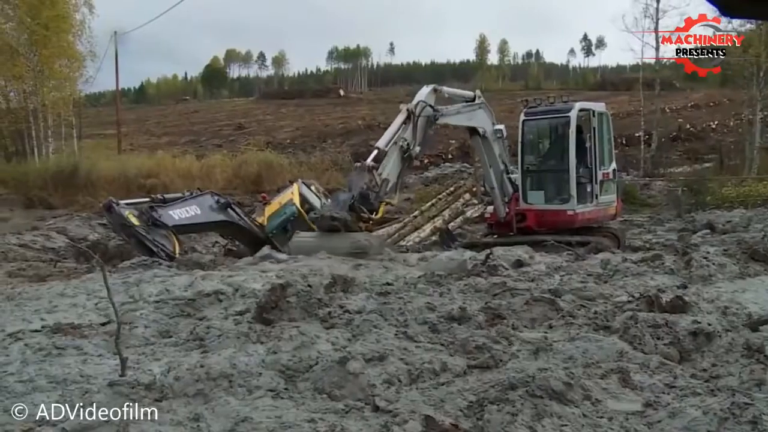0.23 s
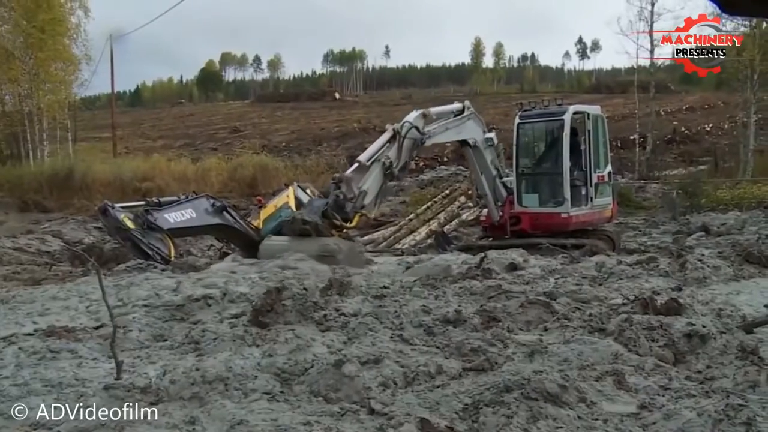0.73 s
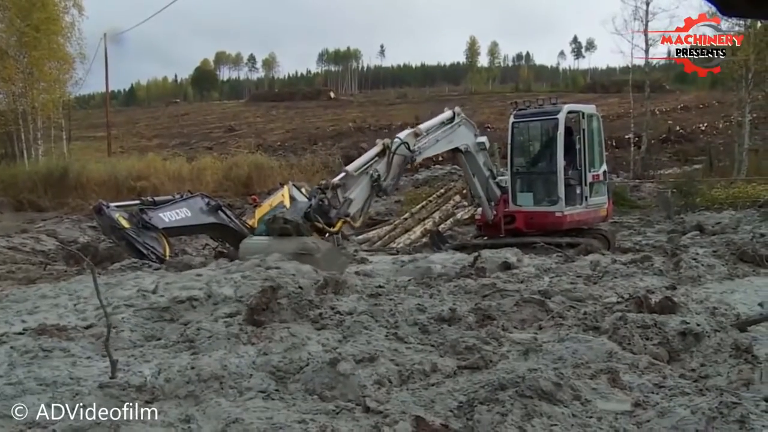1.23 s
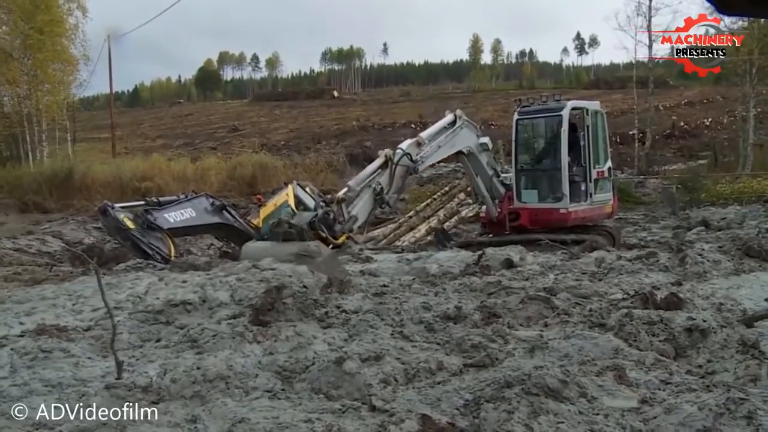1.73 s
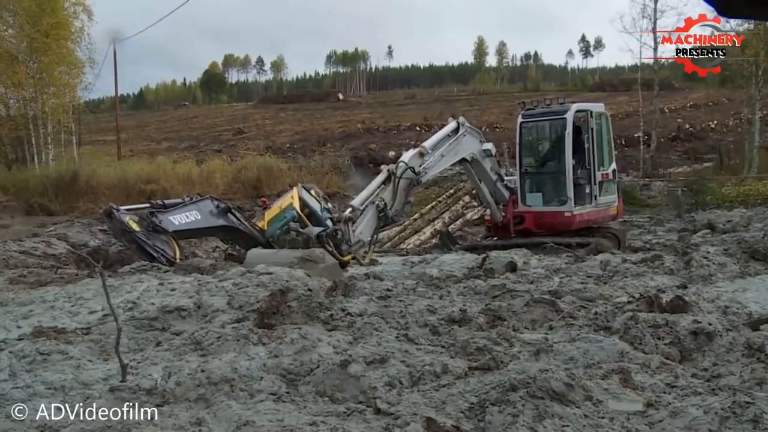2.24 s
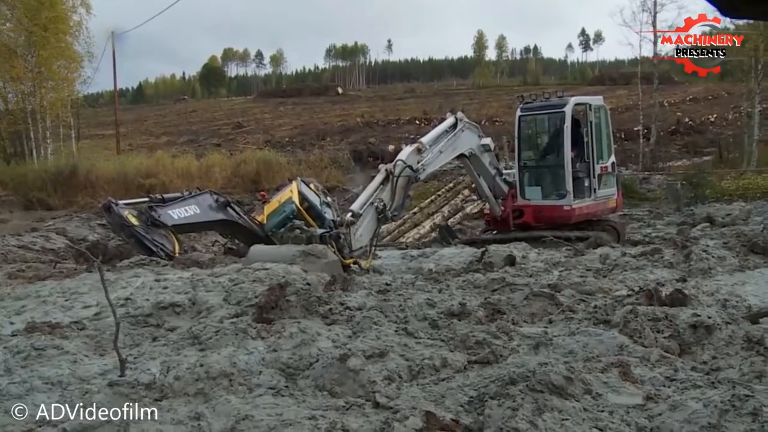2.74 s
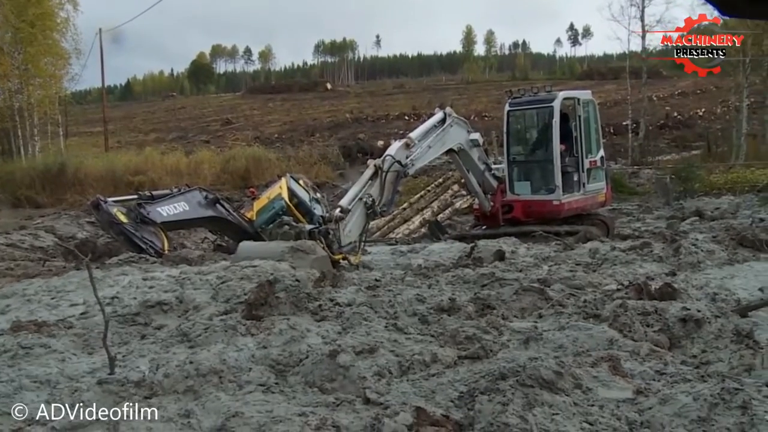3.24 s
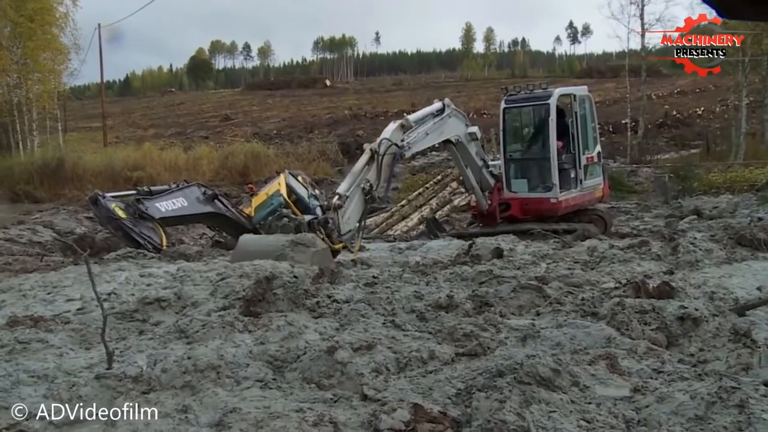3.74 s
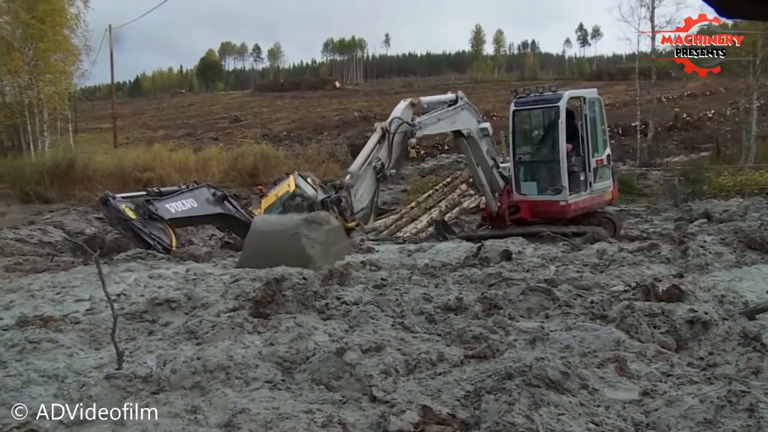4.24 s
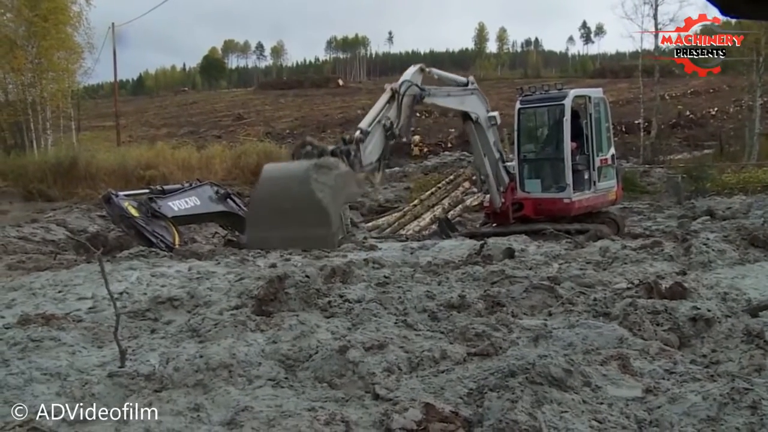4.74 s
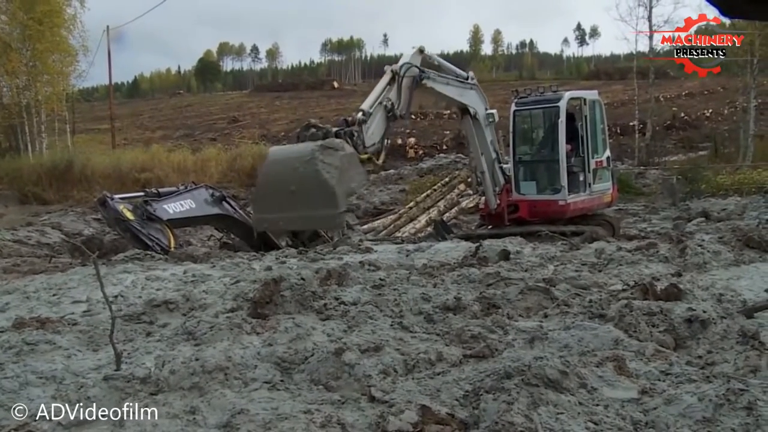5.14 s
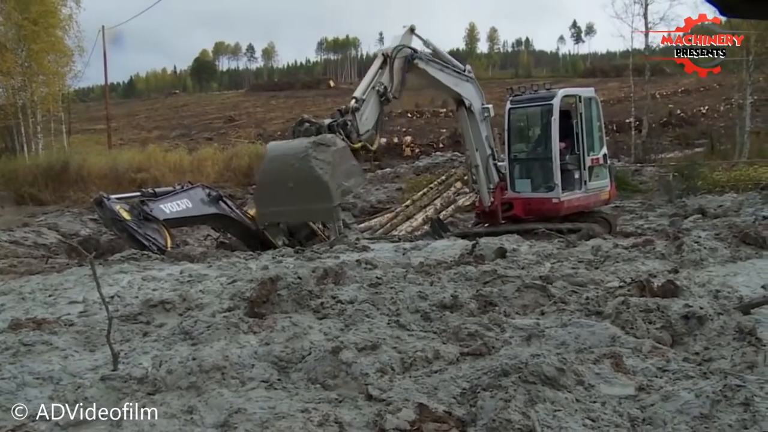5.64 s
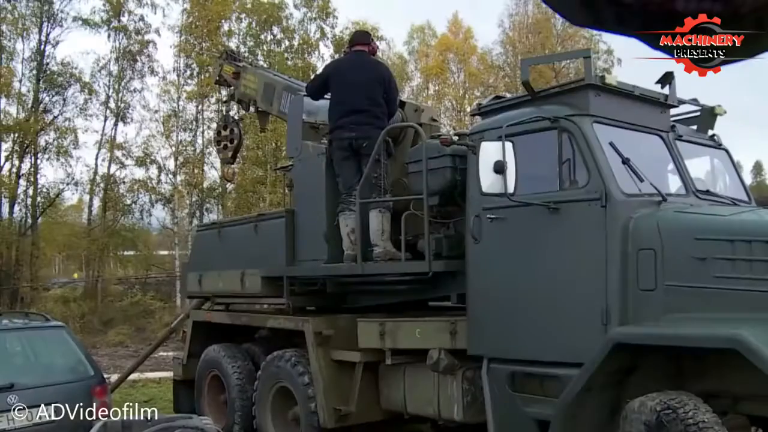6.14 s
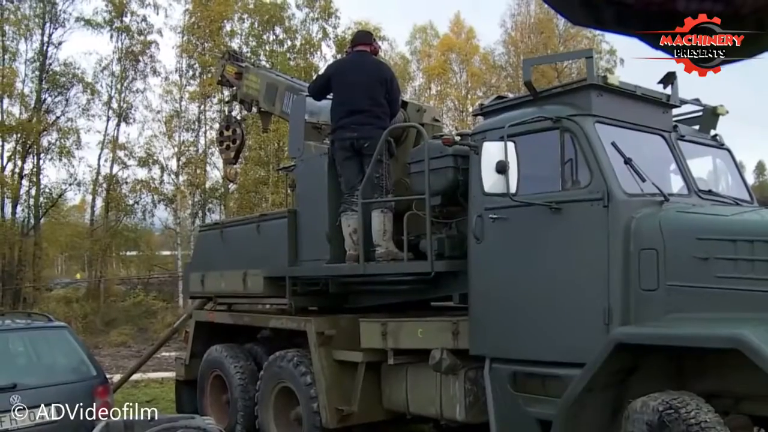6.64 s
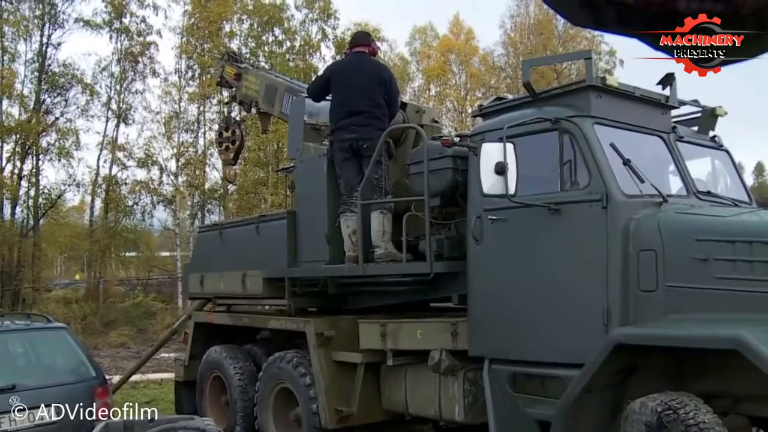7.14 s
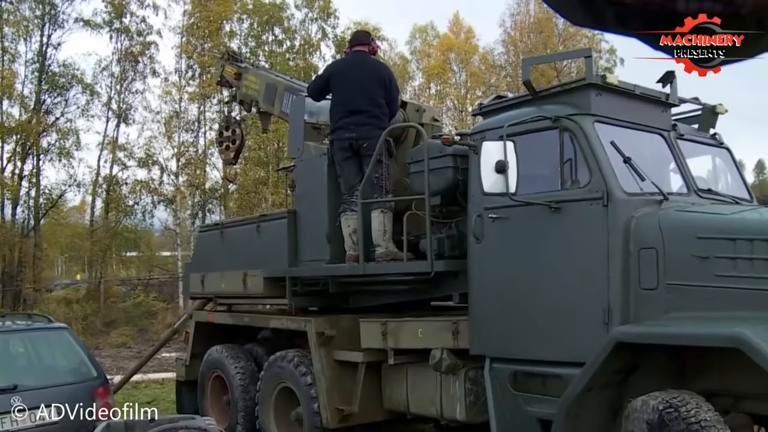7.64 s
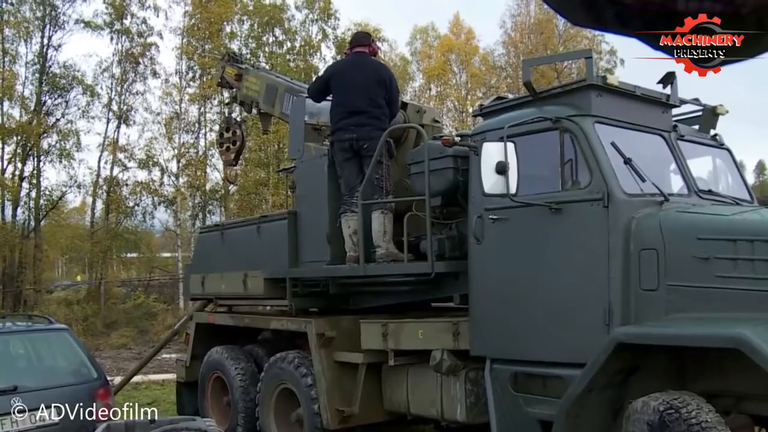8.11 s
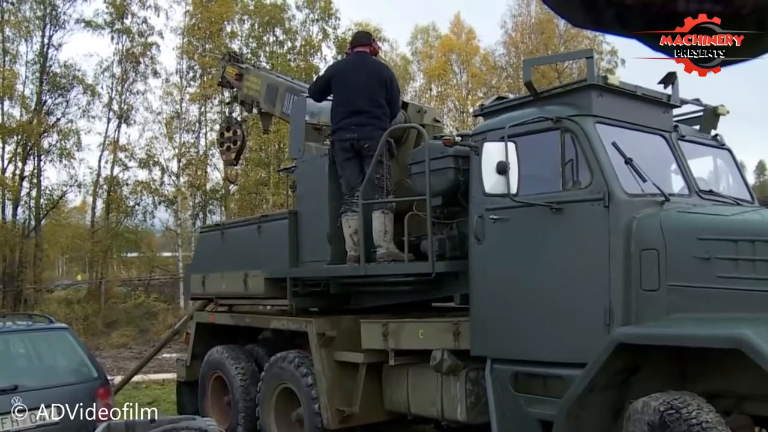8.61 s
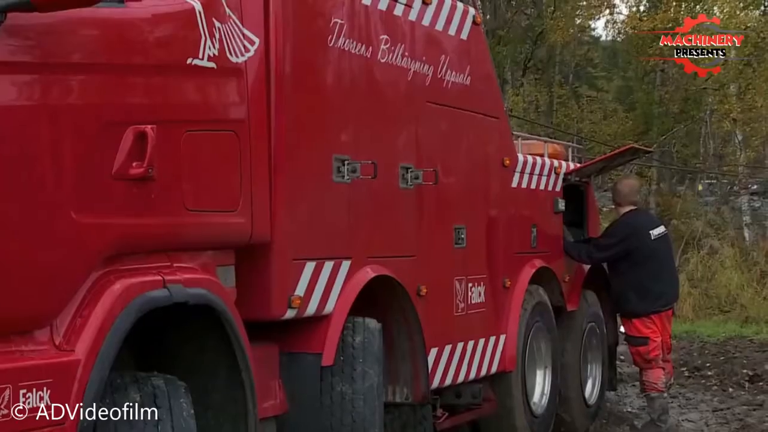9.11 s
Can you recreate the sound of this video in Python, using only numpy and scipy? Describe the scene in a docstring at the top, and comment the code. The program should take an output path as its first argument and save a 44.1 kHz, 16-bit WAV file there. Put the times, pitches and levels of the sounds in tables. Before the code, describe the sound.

Outdoors, an excavator's diesel throbs steadily some way off under a hydraulic pump whine. Its boom groans at the start, snaps crack close by, and oil hisses as the boom lifts. At about six seconds it cuts to a far louder truck engine heard up close, deep and fast-idling with light metallic clanks; at nine seconds another truck takes over, with ticking valves and dense clanking. Stereo, engines stronger on the right.

```python
"""A diesel excavator throbs some way off over pump whine, with boom groans, hissing oil and a few snaps.
At 6.2 s we are suddenly beside a heavy winch truck at fast idle, and at 9 s beside a recovery truck.
Engine and pump tones are multiples of a rotation; engine noise is coloured noise shaped by the firings.
Creaks and clanks are short rings of steel; snaps and ticks are noise bursts through wide resonances.
Two microphone ports hear it all, the right one nearer the engines."""
import sys
import numpy as np
from scipy import signal
from scipy.fft import rfft, irfft, next_fast_len
from scipy.io import wavfile
from scipy.ndimage import uniform_filter1d

SR = 44100
rng = np.random.default_rng(int(sys.argv[2]) if len(sys.argv) > 2 else 0)


def inscribe(sig):
    """Save sig as 16-bit PCM at rate SR to the path in sys.argv[1].

    A 1-D sig is mono; a 2-D sig holds one channel per row.
    Samples are clipped to [-1, 1] before scaling.
    """
    pcm = np.round(np.clip(np.atleast_2d(sig).T, -1, 1) * 32767)
    wavfile.write(sys.argv[1], SR, pcm.astype(np.int16))


N = 413216
T = np.arange(N) / SR  # seconds
F = np.maximum(np.fft.rfftfreq(next_fast_len(N, True), 1 / SR), 1)  # Hz
FFT_LENGTH = 2 * (len(F) - 1)

# Excavator engine and pump over time.
# Each row: time in seconds, shaft speed in Hz, then firing tone, pump tone and pump overtone in dB.
DIGGER = [(0.0, 28.73, -27, -40.5, -51), (0.4, 28.63, -26, -45, -51), (1.0, 28.66, -25.5, -47, -49.5),
          (1.25, 28.32, -25.5, -41.5, -52), (1.45, 28.23, -24.5, -41, -47), (2.0, 28.24, -24.5, -40.5, -43),
          (2.3, 28.32, -26, -37, -40.5), (2.75, 28.16, -26.5, -38, -43), (2.79, 28.25, -23, -42.5, -51),
          (2.93, 28.53, -26.5, -50, -52), (2.98, 29.25, -29, -46, -61), (3.03, 30.1, -29, -41, -53),
          (3.075, 29.97, -24, -47, -58), (3.11, 29.06, -39, -49, -53), (3.17, 28.56, -27.5, -48, -56),
          (3.3, 28.76, -29.5, -41.5, -61), (3.7, 28.92, -26.5, -42, -62), (3.9, 28.84, -27, -53.5, -54),
          (4.1, 28.77, -27.5, -41.5, -52.5), (4.7, 29.22, -27.5, -44.5, -54),
          (5.1, 29.07, -27.5, -54.5, -51), (5.3, 28.78, -29.5, -45, -47), (5.5, 28.73, -25, -38.5, -54),
          (5.7, 28.75, -27.5, -45.5, -56), (6.1, 28.72, -26.5, -35, -46.5), (6.22, 28.64, -25, -38, -54)]
# Steady excavator tones. Each row: multiple of the shaft speed, level in dB.
DIGGER_ORDERS = [(2.5, -47), (3.5, -52), (4, -43), (4.5, -57), (5, -48.5), (5.5, -59), (6, -45.5),
                 (6.5, -59), (7, -55), (7.5, -49), (8, -51.5), (8.64, -50.5), (9.5, -61), (10.5, -62),
                 (15, -63.5)]
# Upper pump tones. Each row: multiple of the shaft speed, level in dB relative to UPPER_PUMP_LEVEL.
UPPER_PUMP = [(30, -13.5), (35, -6.5), (40, -1.5), (50, -7)]
# Level shared by the upper pump tones. Each row: time in seconds, level in dB.
UPPER_PUMP_LEVEL = [(0, -60), (1.2, -55.5), (2.8, -56.5), (2.95, -68), (3.15, -61), (3.4, -60.5),
                    (5.2, -58.5), (5.5, -54), (6.25, -53.5)]
# A hose sings while the bucket strains in the mud.
# The row: start, attack, stop and release in seconds, level in dB.
HOSE = (1.0, .5, 2.755, .03, -47.5)
# Colour of the excavator's noise. Each row: frequency in Hz, relative level in dB per Hz.
DIGGER_BODY = [(8, -27), (25, -9.5), (45, -5), (70, -11), (110, -17.5), (160, -24), (250, -23.5),
               (330, -31), (450, -36.5), (600, -27.5), (820, -38.5), (1400, -31), (1750, -42), (2500, -41),
               (3500, -48.5), (6400, -51), (16000, -61)]
# Resonant excavator panels. Each row: frequency in Hz, width in Hz, lift in dB.
DIGGER_PANELS = [(1268, 55, 4.5), (1440, 67, 4), (2024, 24, 9), (2670, 100, 1.5), (5210, 330, 5),
                 (8050, 320, 5), (9000, 320, 5.5), (9810, 250, 4.5), (12300, 500, 5), (7450, 200, 2.5),
                 (13200, 300, 2)]
# Low rumble around the excavator. Each row: time in seconds, level in dB on the block noise's scale.
DIGGER_RUMBLE = [(0, -41.5), (.5, -47.5), (1.0, -46), (1.6, -43.5), (2.4, -45.5), (2.7, -48.5), (3.3, -46),
                 (3.7, -46), (4.5, -46), (5.4, -45), (6.25, -44.5)]
# Treble hiss of the excavator, before flicker. Each row: time in seconds, level in dB.
DIGGER_HISS = [(0, -58.5), (.65, -60.5), (1.1, -58.5), (2.0, -59), (2.8, -59), (3.15, -60.5), (3.4, -59.5),
               (3.6, -59.5), (4.0, -58.5), (4.6, -58.5), (5.0, -60), (5.6, -58.5), (6.25, -58.5)]
DIGGER_BLOCK_DB = -47
OPENING_DB, OPENING_S = 7.5, 0.027  # block noise and hiss start this much louder, until this time

# Oil hisses through a valve while the boom lifts.
# The row: start, attack, stop and release in seconds, level in dB as it stands at 4 s.
VALVE = (3.1, .45, 4.8, .25, -66)
VALVE_SAG_DB_PER_S = 2.5
# Resonances of that hiss. Each row: frequency in Hz, width in Hz, level in dB relative to VALVE.
VALVE_BANDS = [(6270, 69, -4), (6420, 89.6, -3), (7550, 150, -5)]
# Short puffs of oil as a valve opens.
# Each row: start, attack, stop and release in seconds, level in dB.
PUFFS = [(2.73, 0.02105, 2.77, .04, -61), (3.04, .02, 3.125, .04, -63)]
# Resonance of the puffs. The row: frequency in Hz, width in Hz.
PUFF_BAND = (7200, 600)

# The boom creaks at its pins, one short ring for each slip.
# Each row: time in seconds, peak in dB, ring in Hz, swell in seconds (the peak comes halfway).
GROAN = [(0.022, -38, 660, 0.007), (0.047, -35, 650, .008), (0.065, -36, 620, .014),
         (0.091, -34, 640, 0.0092), (0.119, -31, 645, 0.0074), (0.133, -34, 635, .012),
         (0.144, -30, 636, .014), (0.192, -37, 654, .008), (0.225, -34, 651, .012), (0.245, -32, 633, .01),
         (0.259, -28.5, 620, 0.0082), (0.28, -31, 590, 0.0079), (0.294, -33, 590, 0.007),
         (0.31, -32, 590, 0.0064), (0.344, -34, 600, 0.0067), (0.362, -26.5, 609, 0.0066),
         (0.38, -28, 604, 0.0048), (1.913, -40, 600, 0.0086), (1.93, -37, 600, .008),
         (1.945, -36, 600, 0.0077), (2.026, -32, 598, .008), (2.126, -32, 590, 0.007),
         (2.756, -28, 628, 0.0063)]
# A short falling squeak. The row: start and length in seconds, first and last pitch in Hz, peak in dB.
SQUEAK = (1.034, .028, 1800, 1250, -41)
# A low thud dying away at the start. The row: pitch in Hz, peak in dB, time to fall 60 dB in seconds.
THUD = (104, -18.5, 0.15)

# The two trucks over time.
# Each row: time in seconds, exhaust level, block noise and hiss (before flicker) in dB.
WINCH = [(6.232, -13, -28, -43), (6.3, -5, -27.5, -42), (6.6, -3, -26.5, -42), (7.0, -1.5, -26.5, -39.5),
         (8.0, -1.5, -27, -40), (8.99, -2, -27, -40)]
RECOVERY = [(8.993, 0, -25, -42.5), (9.2, 0, -24.5, -41.5), (9.37, 0, -24.5, -42.5)]
# Exhaust tones. Each row: multiple of the engine cycle, level in dB relative to the exhaust level.
WINCH_ORDERS = [(3, -28), (4, -41), (5, -44), (6, -11), (7, -43), (9, -22), (11, -43), (12, -31), (13, -48),
                (15, -33), (16, -38), (18, -33), (19, -45), (20, -36.5), (21, -40), (22, -50), (24, -44),
                (27, -47), (29, -44), (30, -39.5), (32, -48), (33, -41), (37, -46), (39, -42), (40, -42),
                (70, -43)]
RECOVERY_ORDERS = [(3, -36), (6, -18), (9, -25.5), (12, -27.5), (15, -33.5), (18, -53.5), (24, -39.5),
                   (27, -44.5), (38, -42), (46, -43)]
# Colour of the trucks' noise, the winch truck's low end apart.
# Each row: frequency in Hz, relative level in dB per Hz.
WINCH_RUMBLE = [(8, -38), (22, -24), (60, -23), (110, -27), (170, -27.5), (222, -30), (255, -27)]
WINCH_BODY = [(340, -30.5), (420, -32), (610, -25), (960, -30.5), (1310, -25.5), (1840, -36), (2300, -37.5),
              (3100, -44.5), (7700, -50), (10500, -52.5), (13000, -62), (16000, -61.5)]
RECOVERY_BODY = [(8, -32), (25, -24), (70, -18), (120, -23), (300, -31), (480, -35.5), (694, -24.5),
                 (900, -30), (1080, -33), (1370, -21.5), (1800, -34.5), (2500, -42), (3900, -43),
                 (6300, -52.5), (16000, -66.5)]
# Resonant truck panels. Each row: frequency in Hz, width in Hz, lift in dB.
WINCH_PANELS = [(603, 54, 5), (703, 45, 1.5), (776, 69, 3), (1304, 83, 5.5), (1390, 18, 2.5), (1660, 23, 5),
                (2140, 53, 6), (2450, 30, 6.5), (4000, 710, 3.5), (7690, 270, 4)]
RECOVERY_PANELS = [(710, 82, 4), (854, 150, 3), (1320, 160, 3.5), (1550, 120, 0.5), (1854, 80, 8)]
# Engine cycle in Hz, and a time in seconds at which the first cylinder fires.
WINCH_CYCLE, RECOVERY_CYCLE = (8.598, 7.663), (8.43, 9.102)
THROB = 0.17  # depth of the knock's swell with the three exhaust beats of a cycle
# Tones away from the firing tone leave the pipe late:
# firing multiple, lag in rad per squared multiple, multiples that pull where the rest push.
DIGGER_LAG, TRUCK_LAG = (2, .6, ()), (6, .026, (3, 18))
# A steady hum just under the winch truck's ninth tone beats with it.
# The row: pitch in Hz, level in dB relative to the exhaust level, time of a crest in seconds.
NEIGHBOUR = (73.34, -28, 7.6754)

# Single clanks in the trucks' panels. Each row: time in seconds, peak in dB, ring in Hz.
CLANKS = [(6.757, -23, 1230), (6.945, -18, 1315), (7.677, -21, 1287), (7.985, -17, 1344),
          (8.857, -20, 1280), (8.233, -16, 1380), (8.4775, -15.5, 1280), (8.976, -14.5, 1294),
          (9.003, -24, 1390), (9.0379, -12, 1326), (9.063, -18, 1380), (9.076, -22, 1390),
          (9.094, -28, 1360), (9.111, -17, 1370), (9.186, -14, 1442), (9.1984, -16, 1340),
          (9.221, -16, 1375), (9.2434, -12.5, 1365), (9.262, -18, 1338), (9.312, -22, 1450),
          (9.333, -12, 1357), (9.348, -19, 1297)]
# One loose part of the winch truck clanks once a cycle.
# The row: share of the cycle, typical peak in dB, typical ring in Hz.
LOOSE_PART = (.61, -22.5, 1320)
# Random spread of those clanks. The row: time in seconds, level in dB, ring in Hz.
LOOSE_SCATTER = (.002, 2.5, 50)
CLANK_SWELL_S = 0.005  # the peak comes halfway

# Valve gear of the recovery truck ticks three times a cycle.
# Each row: peak in dB, treble tilt in dB per two octaves.
TICKS = [(-16.5, -7), (-18, -5), (-16.5, -4), (-24, -5), (-27, -3), (-27, -9), (-27, -2), (-29, -7),
         (-25, -6)]
FIRST_TICK_S, TICK_PAN_DB = 9.0165, -9  # pan is left minus right
# Snaps close by.
# Each row: time in seconds, peak in dB, treble tilt in dB per two octaves, left minus right in dB.
SNAPS = [(0.0667, -25.5, -18, -20.5), (0.3012, -23, -12.5, -27), (1.0376, -39, -14, -4.0),
         (1.0755, -36, -9, -13), (2.1001, -19.5, -6, -31), (2.9257, -40, 6.5, -11),
         (4.3789, -22.5, -10.5, -25), (4.9856, -43, -8, -4.0), (5.0631, -28, -11, -23),
         (5.2038, -31, -16, -17), (5.7255, -29.5, -4, -24)]
# Resonances of ticks and snaps. Each row: frequency in Hz, width in Hz, level in dB before the tilt.
TICK_RING = [(4160, 1300, 7.5), (6540, 1100, 5.5), (9700, 3200, 4)]
SNAP_RING = [(1000, 540, -6), (1620, 900, -0.5), (2740, 1300, -1), (4500, 1600, 2.5), (6270, 3800, -1.5),
             (8800, 3000, 5.5), (12200, 3900, -5)]
CRACK_S, CRACK_DB = .0018, 12  # one hard break inside each burst, before its resonances

# What the left port hears beside the right; the excavator stands at another angle than the trucks.
# Each row: frequency in Hz, left minus right in dB, likeness 0-1, phase lead in rad.
DIGGER_PORTS = [(26, -9, .8, -0.78), (55, -7.5, 0.58, -1.13), (80, -7, .75, -1.1), (110, -3, 0.91, -0.82),
                (160, -3, 1, -2), (230, -5, 1, -1.2), (320, -7, .85, -0.64), (432, -1, 0.5, -2.6),
                (620, -11, 0.9, -1.06), (900, -3.5, 0.37, -1.2), (1320, -15.5, 0.6, -0.92),
                (1860, -4, 0.7, -0.3), (2700, -5.5, 0.55, 0.21), (3960, -1, 0.4, 0), (6300, -3, 0.53, 0),
                (10000, -5, .15, 0), (16000, -10, .1, 0)]
TRUCK_PORTS = [(26, -20, .9, -0.62), (52, -10, 0.95, -0.97), (80, -7.5, 0.55, -1.3), (106, -4.5, 0.9, -1.2),
               (140.5, -1, 0.97, -1.85), (175, -6, 0.95, -2.15), (240, -7, 0.85, -1.3),
               (322, -1, 0.72, -1.1), (456, -2.5, 0.62, -2.23), (620, -9.5, 1, -1.3),
               (926, -6, 0.36, -0.72), (1320, -13.5, 1, -1.32), (1850, -6.5, 0.64, -0.66),
               (2700, -4, 0.54, -0.22), (3880, -5, 0.38, -0.007), (6000, -1.5, 0.58, 0.43),
               (9000, -8, 0, 0), (16000, -8, 0.1, 0)]
KNOCK_FROM_HZ, HISS_FROM_HZ, TOP_HZ = 400, 3300, 15900
HISS_FLICKER = 1.8  # size of the hiss's extra flicker, as a multiple of the block noise's


def excavator():
    """A four-stroke engine fires four times in two shaft turns and drives a ten-stroke pump."""
    shaft_hz, firing_db, pump_db, overtone_db, _ = curves(DIGGER)
    turns = np.cumsum(shaft_hz) / SR
    orders = [(2, firing_db), (10, pump_db), (20, overtone_db), (25, held(*HOSE))]
    upper_db = curves(UPPER_PUMP_LEVEL)[0]
    orders += [(k, upper_db + db) for k, db in UPPER_PUMP]
    clean = tones(turns, orders + DIGGER_ORDERS, DIGGER_LAG, waver_db=0.6)

    cycles = turns / 2
    knock = knocks(cycles, 4, decay=0.99, scatter_db=1.5, pattern_db=[0.83, 0.64, 1, 0.094])
    opening_db = OPENING_DB * np.clip((OPENING_S - T) / .004, 0, 1)
    noise = roar(knock, cycles, DIGGER_BODY, DIGGER_PANELS, [.4, .3, .03],
                 rumble_db=curves(DIGGER_RUMBLE)[0], block_db=DIGGER_BLOCK_DB + opening_db,
                 hiss_db=curves(DIGGER_HISS)[0] + opening_db, flicker_db=0.52)
    gate = np.clip((WINCH[0][0] - T) / .006, 0, 1)  # heard until the winch truck takes over
    return gate * (clean + boom()), gate * (noise + hydraulics())


def boom():
    """Pins slip and ring the steel in uneven groans; a squeak glides down and a damped sine thuds."""
    start, length, from_hz, to_hz, squeak_db = SQUEAK
    progress = np.clip((T - start) / length, 0, 1)
    squeak_turns = np.cumsum(from_hz + (to_hz - from_hz) * progress) / SR
    squeak = undb(squeak_db) * np.sin(np.pi * progress) * np.sin(2 * np.pi * squeak_turns)
    thud_hz, thud_db, t60 = THUD
    thud = undb(thud_db) * np.sin(2 * np.pi * thud_hz * T) * np.exp(-np.log(1000) * T / t60)
    return rings(GROAN) + squeak + thud


def hydraulics():
    """Oil forced through a valve is noise in narrow resonances: one long sagging hiss and short puffs."""
    oil = 0
    for hz, width, db in VALVE_BANDS:
        hiss = unit(band(rng.standard_normal((2, N)), hz, width))
        oil = oil + undb(db + 2.2 * walk(7.09)) * hiss
    oil_db = held(*VALVE) - VALVE_SAG_DB_PER_S * (T - 4)
    puff_noise = unit(band(rng.standard_normal((2, N)), *PUFF_BAND))
    return undb(oil_db) * oil + sum(undb(held(*row)) for row in PUFFS) * puff_noise


def truck(table, cycle, orders, body, panels, pattern_db, share):
    """Exhaust tones on the engine cycle over knocking block noise and fan hiss."""
    exhaust_db, block_db, hiss_db, gate = curves(table)
    cycle_hz, fires_s = cycle
    turns = cycle_hz * T + 1 - cycle_hz * fires_s % 1  # a whole number when the first cylinder fires
    knock = knocks(turns, len(pattern_db), decay=.75, scatter_db=.8, pattern_db=pattern_db)
    knock = knock * (1 + THROB * np.cos(6 * np.pi * (turns - .04)))
    noise = roar(knock, turns, body, panels, share, block_db, block_db, hiss_db, flicker_db=.25)
    exhaust = undb(exhaust_db) * tones(turns, orders, TRUCK_LAG, waver_db=.4)
    return gate * exhaust, gate * noise


def clanks():
    """Struck panels ring briefly: single clanks, and the loose part on every winch truck cycle."""
    share, db, hz = LOOSE_PART
    cycle_hz, fires_s = WINCH_CYCLE
    loose = [(fires_s + (k + share) / cycle_hz, db, hz) for k in range(-12, 11)]
    loose = loose + rng.standard_normal((len(loose), 3)) * LOOSE_SCATTER
    return rings([(*row, CLANK_SWELL_S) for row in [*CLANKS, *loose]])


def ticks():
    """Valve gear taps at even steps of the engine cycle, each tap a short noise burst."""
    gap = 1 / (3 * RECOVERY_CYCLE[0])
    table = [(FIRST_TICK_S + k * gap, db, treble_db, TICK_PAN_DB)
             for k, (db, treble_db) in enumerate(TICKS)]
    return clicks(table, TICK_RING, t60=0.027)


def snaps():
    """Snaps close by: noise bursts that die away in a few wide resonances."""
    return clicks(SNAPS, SNAP_RING, t60=0.017)


def neighbour():
    """A steady sine beside the winch truck that beats with its ninth exhaust tone."""
    hz, db, crest_s = NEIGHBOUR
    exhaust_db, *_, gate = curves(WINCH)
    return gate * np.sqrt(2) * undb(db + exhaust_db) * np.cos(2 * np.pi * hz * (T - crest_s))


def tones(turns, orders, lag, waver_db):
    """Clean multiples of a rotation, spread out behind each pulse and wavering a little."""
    firing, lag_rad, pulling = lag
    total = 0
    for k, db in orders:
        sign = -1 if k in pulling else 1
        level = sign * np.sqrt(2) * undb(db + waver_db * walk(5))
        total = total + level * np.cos(2 * np.pi * k * turns - lag_rad * (k - firing) ** 2)
    return total


def knocks(turns, firings, decay, scatter_db, pattern_db):
    """Envelope with a rounded burst at each firing; some cylinders are louder and every firing differs."""
    which = (turns * firings).astype(int)
    phase = turns * firings % 1  # decay is a share of the gap between firings
    scatter = scatter_db * rng.standard_normal(N // 100)[which]
    size = undb(scatter + np.array(pattern_db)[which % firings])
    return unit(uniform_filter1d(size * np.exp(-phase / decay), size=200))


def roar(knock, turns, body, panels, share, rumble_db, block_db, hiss_db, flicker_db):
    """Two unrelated noises in the body's colour: rumble, partly repeating block knock, and hiss."""
    block_knock, hiss_knock, repeat = share
    lift_db = sum(db / (1 + (2 * (F - hz) / width) ** 2) for hz, width, db in panels)
    gain = undb(over_hz(body)[0] + lift_db)
    rumble = 1 / (1 + (F / KNOCK_FROM_HZ) ** 6)
    hiss = 1 / (1 + (HISS_FROM_HZ / F) ** 6)
    block = 1 - rumble - hiss
    steps = int(N / (turns[-1] - turns[0]))  # samples in a cycle
    # the same blows at the same crank angle
    clatter = rng.standard_normal((2, SR))[:, (turns % 1 * steps).astype(int)]

    def layer(part, reference, knock_share, same, db):
        """One frequency range of the noise, scaled by the reference range above 900 Hz."""
        noise = np.sqrt(1 - same) * rng.standard_normal((2, N)) + np.sqrt(same) * clatter
        noise = noise * np.sqrt(1 - knock_share + knock_share * knock ** 2)
        scale = np.sqrt(np.mean((gain * reference * (F > 900)) ** 2))
        coloured = irfft(rfft(noise, FFT_LENGTH) * gain * np.sqrt(part), FFT_LENGTH)[:, :N]
        return coloured / scale * undb(db + flicker_db * walk(8.3))

    hiss_db = hiss_db + HISS_FLICKER * flicker_db * walk(14)
    return (layer(rumble, block, 0, 0, rumble_db)
            + layer(block, block, block_knock, repeat, block_db)
            + layer(hiss, hiss, hiss_knock, 0, hiss_db))


def rings(table):
    """Short swells of one steel resonance: a soft push, then decay."""
    out, t = np.zeros(N + 4096), np.arange(4096) / SR
    for s, db, hz, swell_s in table:
        u = 2 * t / swell_s
        i = int(s * SR)
        out[i:i + 4096] += undb(db) * u * np.exp(1 - u) * np.sin(2 * np.pi * hz * (t + s))
    return out[:N]


def clicks(table, ring, t60):
    """Short noise cracks through a few wide rings; each has its own treble tilt around 3 kHz."""
    out, t = np.zeros((2, N + 2048)), np.arange(2048) / SR
    envelope = np.exp(-np.log(1000) * t / t60) * np.minimum(t / .001, 1)
    for s, db, treble_db, pan_db in table:
        burst = rng.standard_normal(2048) * envelope
        burst[int(CRACK_S * SR)] = undb(CRACK_DB)
        crack = 0
        for k, (hz, width, ring_db) in enumerate(ring):
            level = undb(ring_db + treble_db * np.log2(hz / 3000) / 2)
            ringing = band(band(burst, hz, width), hz, width)
            crack = crack + (-1) ** k * level * unit(ringing)
        pan = 2 / (1 + undb(np.array([[-pan_db], [pan_db]])))
        i = int(s * SR)
        out[:, i:i + 2048] += undb(db) * pan * crack / np.abs(crack).max()
    return out[:, :N]


def ports(clean, noise, table):
    """The left port differs in level and phase; part of its noise is unrelated to the right's."""
    pan_db, like, lead = over_hz(table)
    like = np.clip(like, 0, 1)
    shade = undb(pan_db) * np.exp(1j * lead)
    mid_gain = np.abs(1 + shade * like) / 2  # evens out the mean of the two ports
    tone = rfft(clean, FFT_LENGTH) / mid_gain
    shared, other = rfft(noise, FFT_LENGTH) / mid_gain
    left = shade * (tone + like * shared + np.sqrt(1 - like ** 2) * other)
    return irfft(np.array([left, tone + shared]), FFT_LENGTH)[:, :N]


def held(start, attack, stop, release, db):
    """Level in dB that climbs 25 dB over the attack, holds, and falls 25 dB over each release time."""
    before, after = (start + attack - T) / attack, (T - stop) / release
    return db - 25 * np.maximum(np.maximum(before, after), 0)


def curves(table):
    """Columns as curves in time, and a gate that is open while the table lasts."""
    s, *columns = np.transpose(table)
    gate = np.clip(np.minimum(T - s[0] + .002, s[-1] - T + .002) / .004, 0, 1)
    return [np.interp(T, s, column) for column in columns] + [gate]


def over_hz(table):
    """Columns as curves over log frequency."""
    hz, *columns = np.transpose(table)
    return [np.interp(np.log(F), np.log(hz), column) for column in columns]


def walk(rate):
    """Random levels 1 / rate s apart, joined by straight lines; spread near 1."""
    count = int(rate * N / SR) + 2
    return 1.2 * np.interp(T * rate, np.arange(count), rng.standard_normal(count))


def band(x, hz, width):
    """A resonance of the given centre and width."""
    return signal.lfilter(*signal.iirpeak(hz, hz / width, SR), x)


def undb(db):
    """Gain of a level in dB."""
    return 10 ** (np.asarray(db) / 20)


def unit(x):
    """Scale to rms 1."""
    return x / np.sqrt(np.mean(x ** 2))


def scene():
    """One machine after the other, with the snaps and ticks on top."""
    winch_tones, winch_noise = truck(
        WINCH, WINCH_CYCLE, WINCH_ORDERS, WINCH_RUMBLE + WINCH_BODY, WINCH_PANELS,
        pattern_db=[-2.5, -3, -1.5, -2.5, -3, -1.5, -2.5, -3.5], share=[.4, .02, .35])
    recovery_tones, recovery_noise = truck(
        RECOVERY, RECOVERY_CYCLE, RECOVERY_ORDERS, RECOVERY_BODY, RECOVERY_PANELS,
        pattern_db=[0.23, -2, -1.0, -0.84, -1.8, -2], share=[.4, .2, .05])
    truck_clean = winch_tones + recovery_tones + neighbour() + clanks()
    digger = ports(*excavator(), DIGGER_PORTS)
    trucks = ports(truck_clean, winch_noise + recovery_noise, TRUCK_PORTS)
    return digger + trucks + snaps() + ticks()


def record(dry):
    """Peaks beyond full scale are clipped flat, then a steep low-pass cuts the top."""
    low_pass = signal.ellip(10, .2, 80, TOP_HZ, fs=SR, output="sos")
    return signal.sosfilt(low_pass, np.clip(dry, -1, 1))


dry = scene()
out = record(dry)
inscribe(out)
```